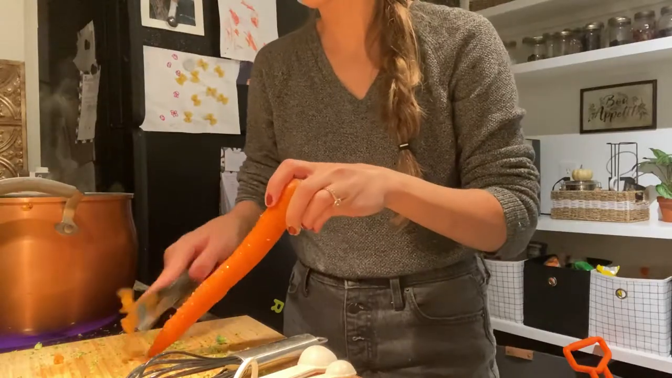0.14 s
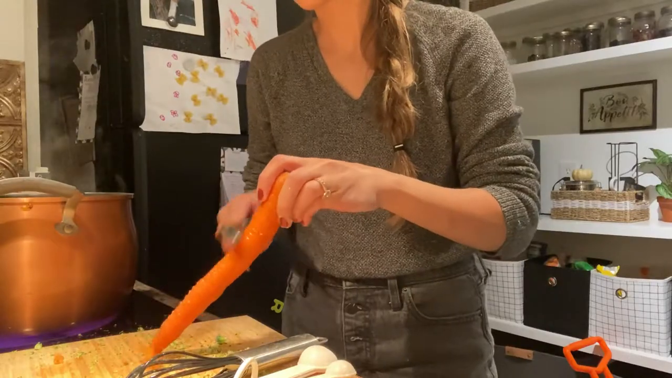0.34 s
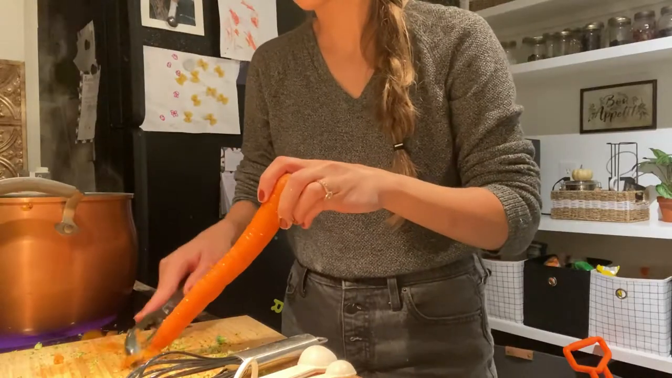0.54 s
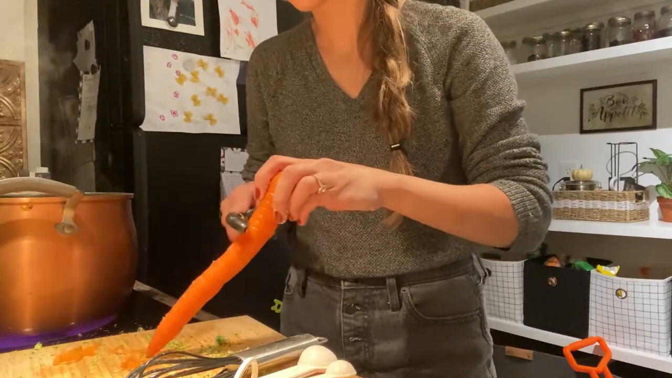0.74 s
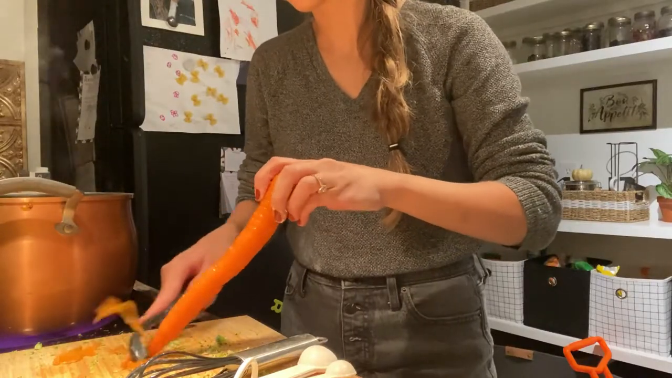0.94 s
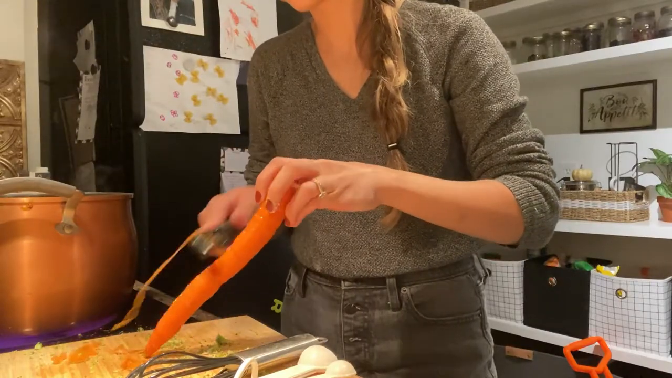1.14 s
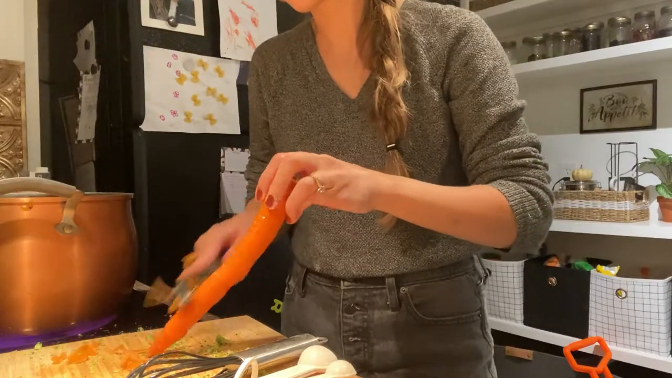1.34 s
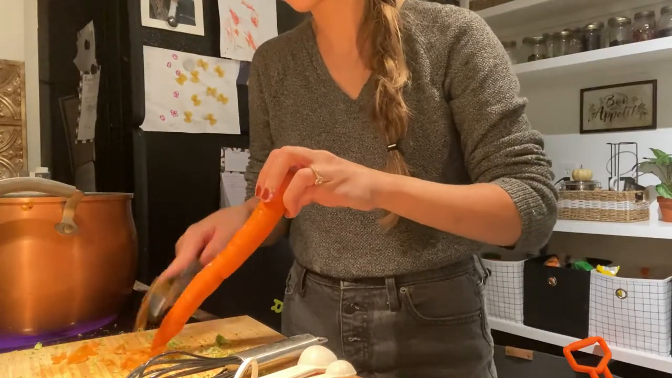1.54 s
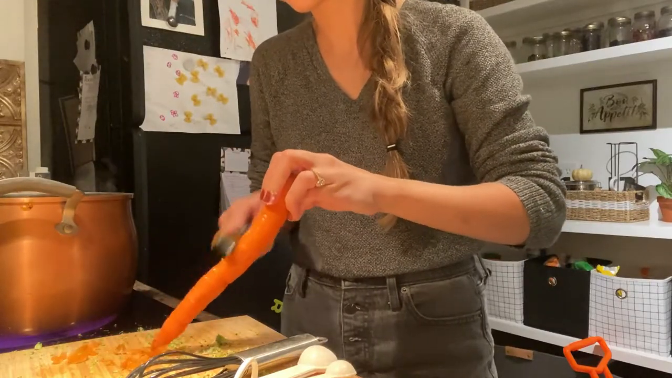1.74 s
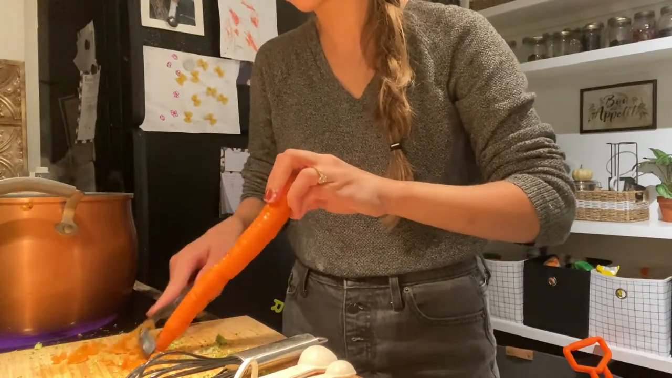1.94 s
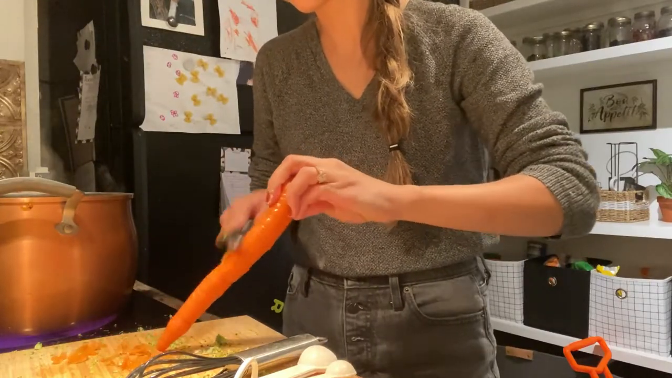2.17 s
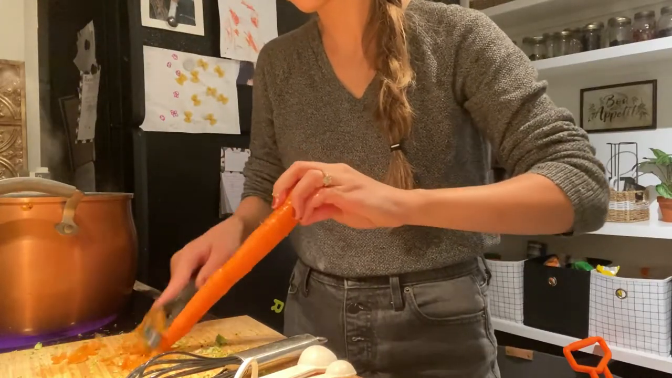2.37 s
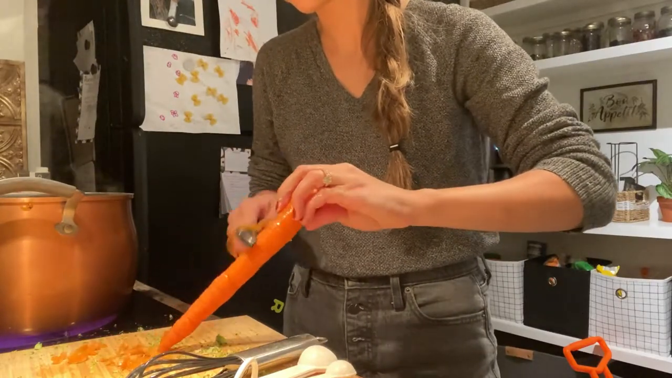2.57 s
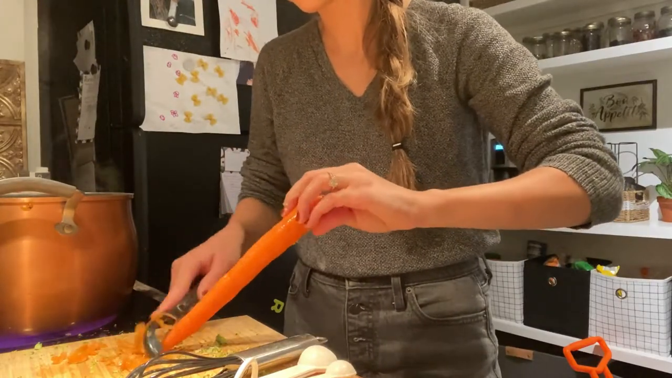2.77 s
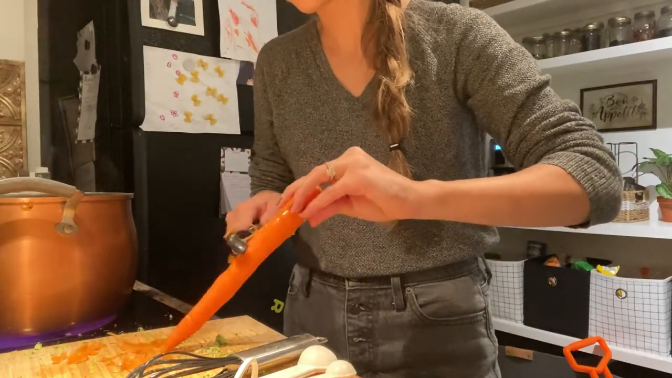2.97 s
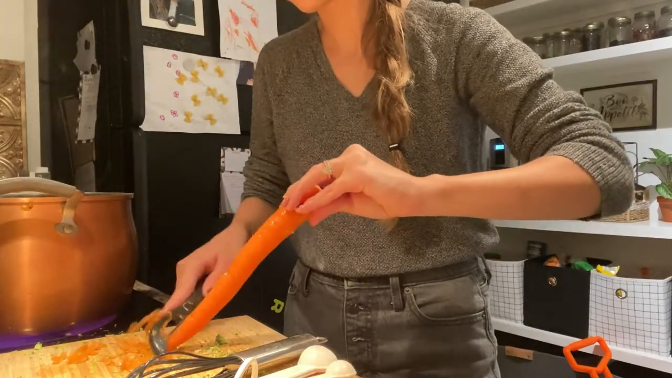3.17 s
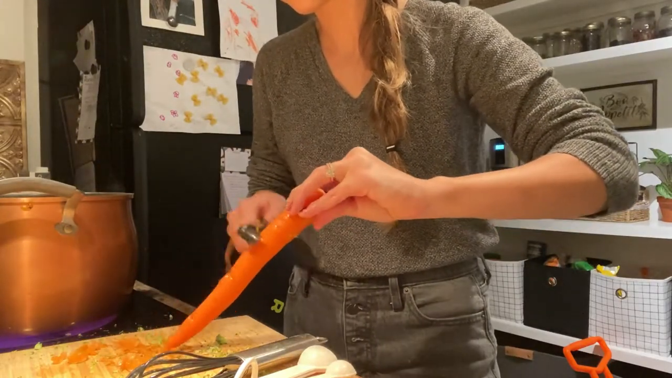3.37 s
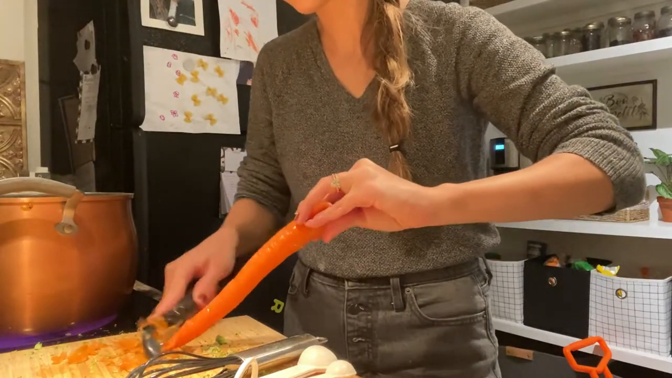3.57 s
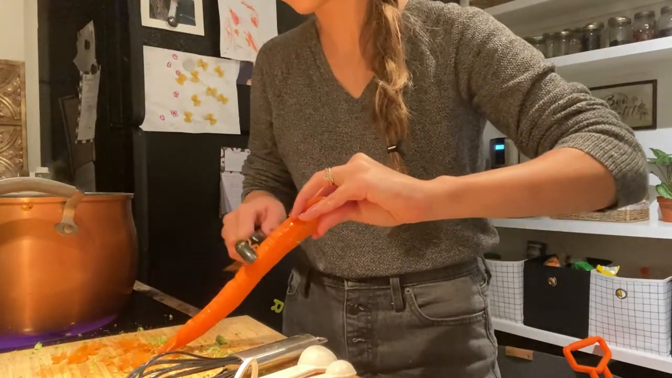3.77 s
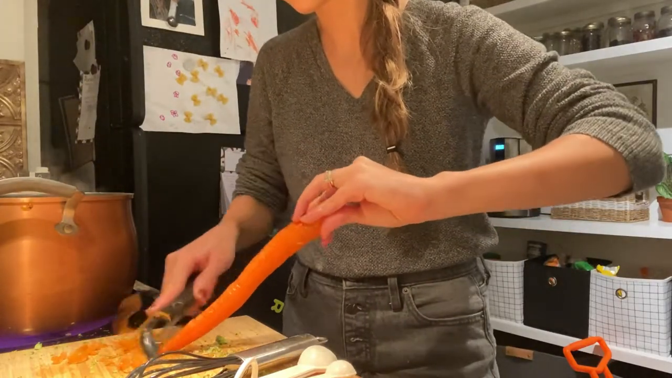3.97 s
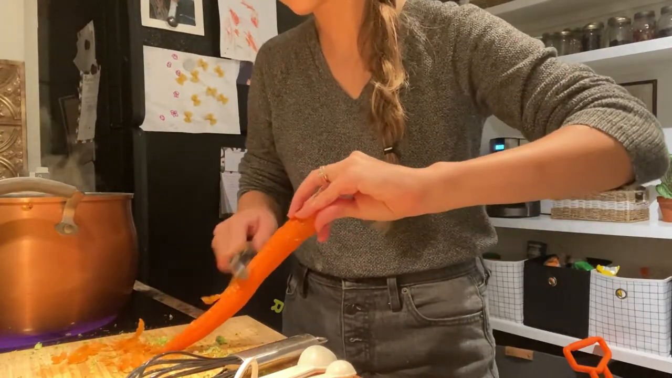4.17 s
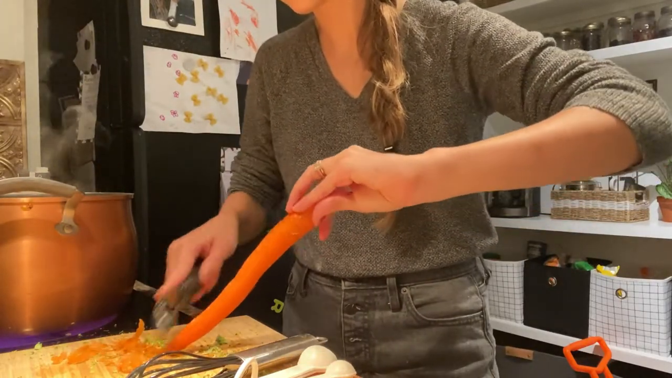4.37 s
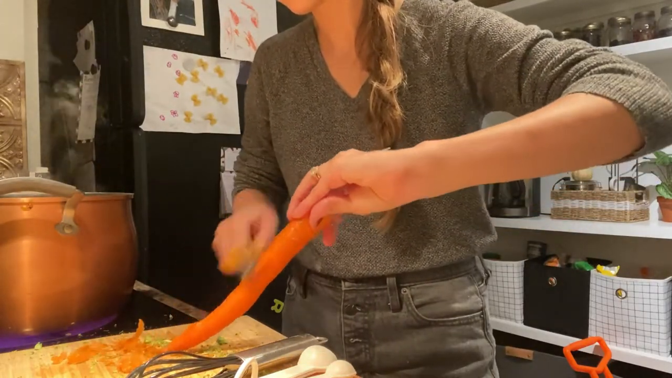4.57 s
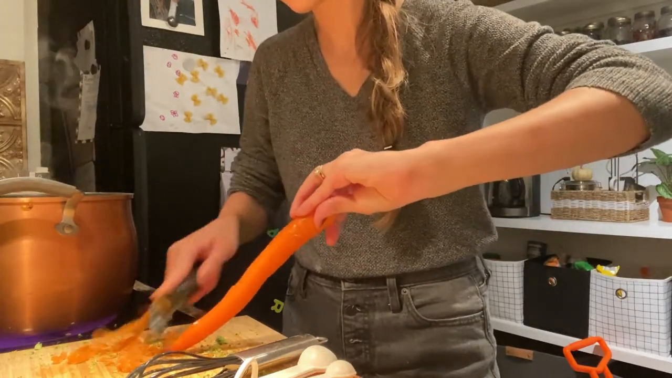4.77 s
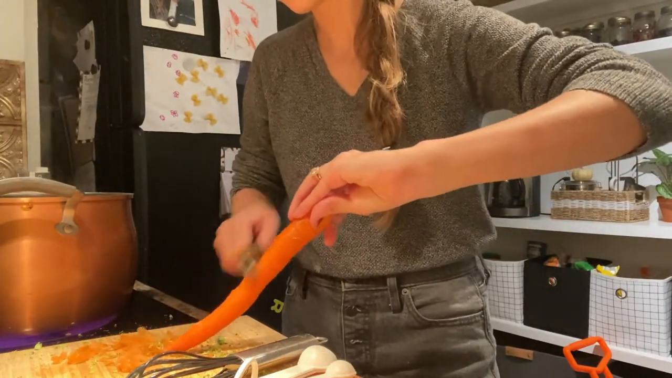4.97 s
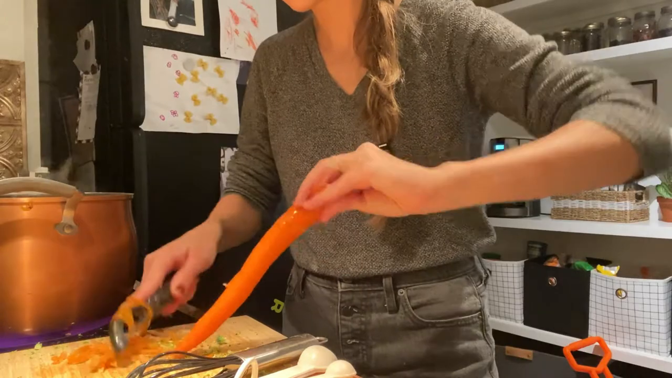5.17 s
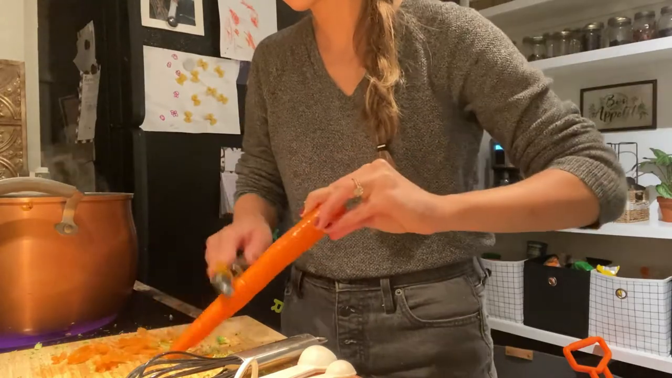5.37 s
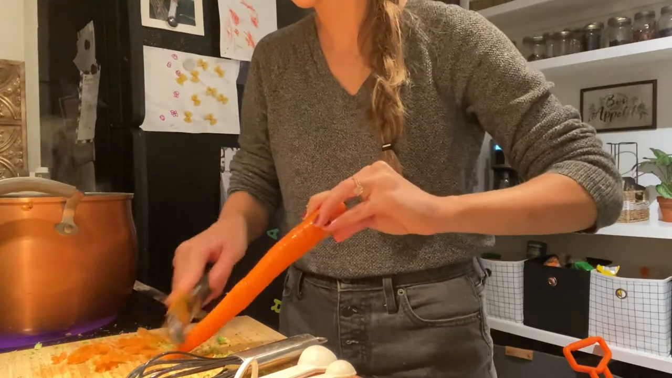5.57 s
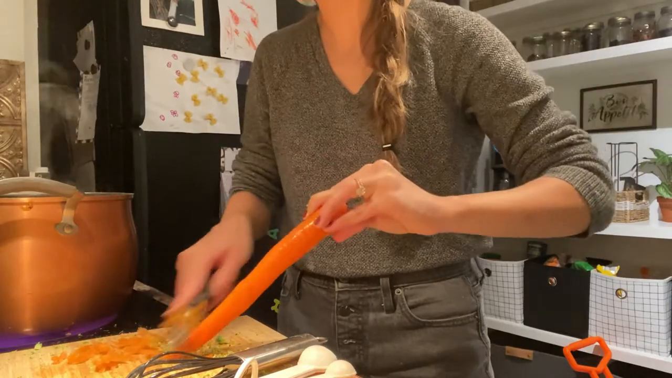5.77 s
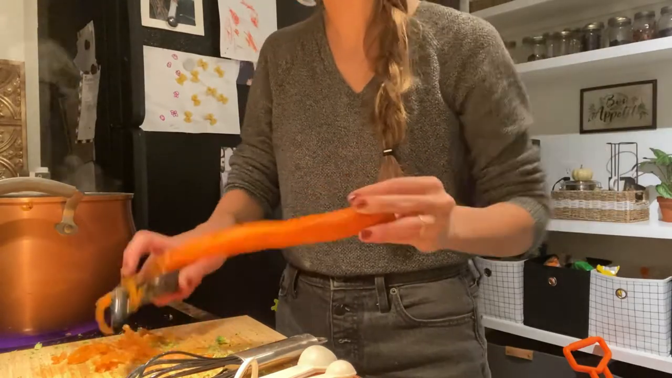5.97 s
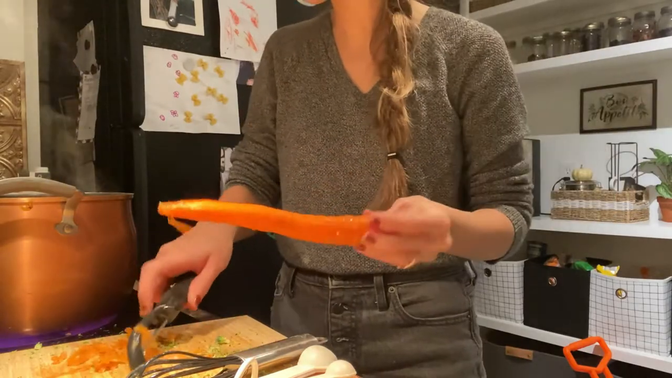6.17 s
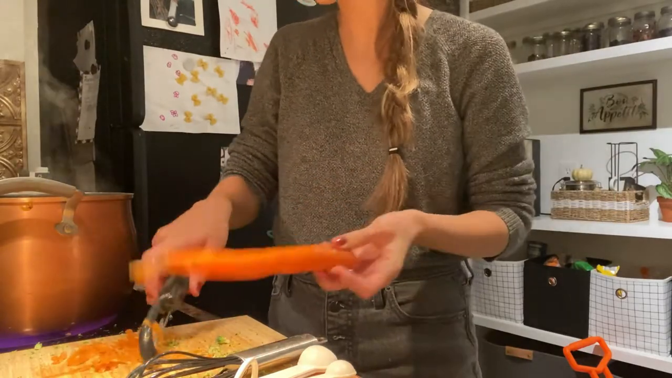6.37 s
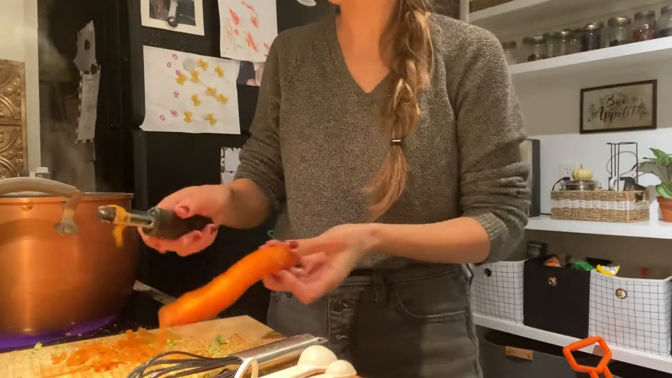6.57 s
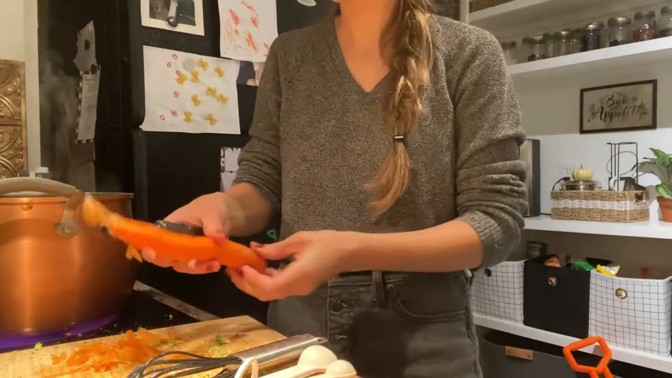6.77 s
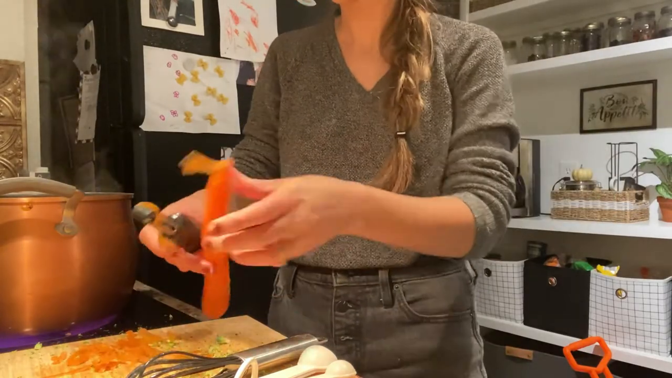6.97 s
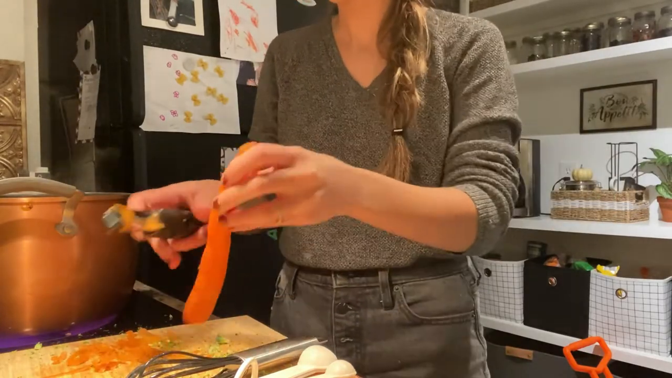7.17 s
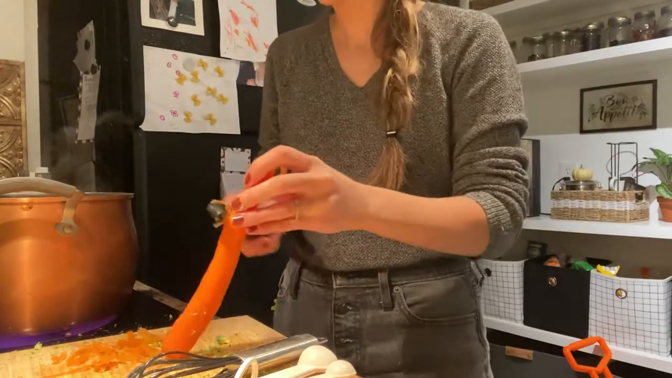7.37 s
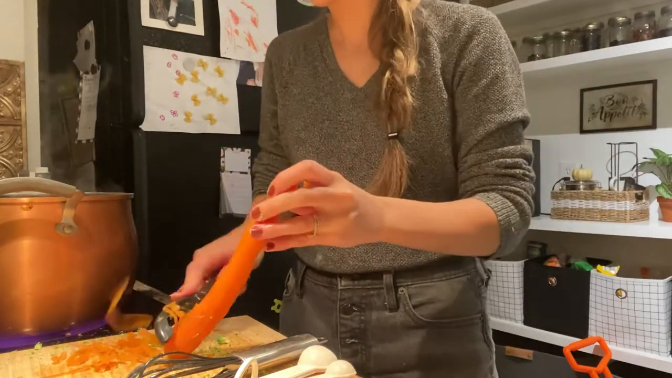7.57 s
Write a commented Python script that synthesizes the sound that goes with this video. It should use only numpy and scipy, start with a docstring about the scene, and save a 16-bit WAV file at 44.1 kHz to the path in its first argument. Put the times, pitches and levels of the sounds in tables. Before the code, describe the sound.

A loose-bladed peeler rasps down a raw carrot in quick crunchy strokes, knocking a wooden board, then taps clean, pauses and resumes.

```python
"""In a small kitchen, a swivel peeler strips a raw carrot whose tip rests on a wooden board.
Each stroke: the loose blade clacks onto the carrot as impacts ringing in steel modes, then crunches down it
as filtered grains and snaps while the board rumbles; often the peeler knocks on the board's resonances.
Three taps shake the peel off, a sleeve brushes as the carrot is turned over and set down, peeling resumes.
Air noise and a low drone lie behind; two microphones hear it all with near reflections and a tail."""
import sys
import numpy as np
from scipy import signal
from scipy.fft import rfft, irfft
from scipy.io import wavfile

SR = 44100
rng = np.random.default_rng(int(sys.argv[2]) if len(sys.argv) > 2 else 0)


def inscribe(sig):
    """Save sig as 16-bit PCM at rate SR to the path in sys.argv[1].

    A 1-D sig is mono; a 2-D sig holds one channel per row.
    Samples are clipped to [-1, 1] before scaling.
    """
    pcm = np.round(np.clip(np.atleast_2d(sig).T, -1, 1) * 32767)
    wavfile.write(sys.argv[1], SR, pcm.astype(np.int16))


N = 335601
TIME = np.arange(N) / SR
RING = TIME[:SR // 2]  # time axis of short sounds, s

# Pulls down the carrot. Each row: blade landing in seconds, length in seconds, clack level in dB,
# strongest ring in Hz, crunch at the tip in dB, juicy fizz at the tip in dB, board rumble at the
# hardest push in dB, place of that push along the stroke (0-1).
STROKES = [(-0.13, 0.23, -45, 5960, -38, -40, -29, 0.73), (0.3355, 0.24, -36.5, 5080, -41, -44.5, -29, 0.7),
           (0.7694, 0.23, -39.5, 6060, -41, -41.5, -32, 0.72),
           (1.283, .21, -42, 5600, -41, -43.5, -31, 0.72),
           (1.728, 0.22, -32, 7360, -40.5, -40.5, -27.5, 0.8),
           (2.1761, 0.21, -36, 6700, -40.5, -40, -26.5, 0.89), (2.594, 0.2, -34, 5380, -38, -40, -29, 0.9),
           (3.005, 0.23, -35.5, 6120, -37.5, -41.5, -33, 0.87),
           (3.452, 0.16, -38, 6500, -40, -41.5, -30, 0.7),
           (3.8363, 0.15, -30, 6660, -35, -38.5, -26.5, 0.99),
           (4.1976, .18, -32, 6030, -37, -45, -32.5, 0.76), (4.567, 0.19, -34, 6420, -35.5, -39, -28, 0.7),
           (4.9746, 0.2, -31.5, 6280, -38.5, -40, -33.5, 0.83),
           (5.449, 0.085, -35.5, 6960, -37.5, -40, -42, 0.65),
           (5.7662, 0.12, -39.5, 5760, -41.5, -40.5, -35, 0.87),
           (7.451, 0.12, -37.5, 6100, -42.5, -39.5, -24.5, 0.91)]
# Spectrum of the crunching flesh. Each row: frequency in Hz, level in dB.
CRUNCH_SPECTRUM = [(250, -31.5), (380, -6.5), (480, 0.5), (620, 4.5), (760, -10), (930, 3.5), (1100, -3),
                   (1360, 1.5), (1570, -5), (1800, -10.5), (2020, 3.5), (2400, 0.5), (2700, -8), (3400, -1),
                   (4100, -13), (5500, -30.5)]
# Spectrum of juice and wet peel. Each row: frequency in Hz, level in dB.
FIZZ_SPECTRUM = [(1760, -23), (3000, -7), (5620, -12.5), (7220, -10), (8900, -14.5), (10500, 0.5),
                 (11400, -16.5), (13100, -14), (14400, -14), (15900, -40.5)]


def undb(db):
    """Decibels to gain."""
    return 10 ** (np.asarray(db) / 20)


def on_log(hz, points):
    """Read (Hz, value) points on a log-frequency axis."""
    f, value = np.transpose(points)
    return np.interp(np.log(hz + 1), np.log(f), value)


def colour(x, points):
    """Minimum-phase filter with a (Hz, dB) spectrum and unit power gain."""
    size = 4096
    gain = undb(on_log(np.arange(size // 2 + 1) * SR / size, points))
    # folding the cepstrum makes the response causal
    cepstrum = irfft(np.log(gain))
    cepstrum[1:size // 2] *= 2
    cepstrum[size // 2 + 1:] = 0
    response = irfft(np.exp(rfft(cepstrum)))
    return signal.fftconvolve(x, response / np.linalg.norm(response))[:len(x)]


def burst(x, db):
    """Scale a short sound so that its energy, spread over 30 ms, has the given level."""
    return x * undb(db) / np.sqrt(np.sum(x ** 2) / (.03 * SR))


def ring(modes):
    """Impulse response of (Hz, dB, t60 s) modes."""
    return sum(undb(db - 60 * RING / t60) * np.sin(2 * np.pi * hz * RING) for hz, db, t60 in modes)


def drive(force, response):
    """Play a force through a response."""
    return signal.fftconvolve(force, response)[:len(force)]


def add(track, s, sound):
    """Mix a sound in at a time in seconds."""
    start = int(s * SR)
    part = sound[max(-start, 0):max(N - start, 0)]
    track[max(start, 0):max(start, 0) + len(part)] += part


def grains(length, per_s, spread_db):
    """Random tiny impacts of uneven size, rms 1."""
    size = undb(spread_db * np.minimum(rng.exponential(size=length), 4))
    x = (rng.random(length) < per_s / SR) * size * rng.choice([-1, 1], length)
    return x / np.sqrt(np.mean(x ** 2))


def walk(per_s):
    """Smooth chance with a spread near 1, given new values per second."""
    return 1.2 * np.interp(TIME * per_s, np.arange(4000), rng.standard_normal(4000))


def peeling():
    """Cells burst in uneven spurts, fibres crack and tear in short pitched snaps, the drag shakes the board."""
    catch_db, spurt_db = 4, -1.9  # unevenness: quick catches, slower spurts
    cracks_per_s, crack_db = 110, -4.5  # tough fibres that break singly, against the cells
    crunch_gain, fizz_gain, rumble_gain = stroke_gains()
    # the blade catches and frees itself about a hundred times a second
    grip = undb(catch_db * walk(110) + spurt_db * walk(45))
    cracks = undb(crack_db) * grains(N, cracks_per_s, 2.3)
    cells = (grains(N, 5000, 2.1) + cracks) * grip
    juice = grains(N, 7200, 4.2) * grip
    snaps = np.zeros(N)
    for when, pitch, size in rng.random((2400, 3)):
        hz = 430 * 7 ** pitch
        cycles = RING[:700] * hz
        snap = size ** 2 * hz * np.sin(2 * np.pi * cycles) * np.exp(-cycles / 3.4)
        add(snaps, when * N / SR, snap)
    tearing = wander(colour(0.64 * cells + 0.28 * snaps / snaps.std(), CRUNCH_SPECTRUM))
    fizz = colour(0.5 * cells + 0.71 * juice, FIZZ_SPECTRUM)
    # Board shaken by the dragging carrot. Each row: frequency in Hz, level in dB.
    rumble_spectrum = [(25, -14), (60, -12.5), (105, -4.5), (155, 3.5), (200, -10), (260, -5.5), (380, -27),
                       (600, -36.5)]
    rumble = colour(grains(N, 700, 1.5), rumble_spectrum)
    return crunch_gain * tearing + fizz_gain * fizz + rumble_gain * rumble


def stroke_gains():
    """Crunch, fizz and rumble gains: the blade glides, bites, speeds to the tip; the push shakes the board."""
    bite_share = 0.43  # the blade glides over this share of a stroke before it digs in
    bite_s, release_s = 0.012, 0.044  # it sinks into the flesh, and runs off the tip
    glide_db = -7.5  # gliding against cutting
    crunch_swell_db, fizz_swell_db = 15, -2.5  # change over a whole stroke
    rumble_sag_db = 26  # fall per stroke length away from the hardest push
    gains = np.zeros((3, N))
    for s, length, _, _, crunch_db, fizz_db, rumble_db, push in STROKES:
        bite = bite_share * length
        corners_s = [0, bite - bite_s / 2, bite + bite_s / 2, length, length + release_s]
        depth = np.interp(TIME - s, corners_s, [0, undb(glide_db), 1, 1, 0])
        touching = depth > 0
        along = np.minimum((TIME[touching] - s) / length, 1)
        gains[:, touching] += depth[touching] * undb([crunch_db + crunch_swell_db * (along - 1),
                                                      fizz_db + fizz_swell_db * (along - 1),
                                                      rumble_db - rumble_sag_db * abs(along - push)])
    return gains


def wander(x):
    """As the blade moves, the low, middle and high parts swell and sink on their own."""
    wander_db, wander_per_s = 3.5, 35
    low, upto = (signal.sosfiltfilt(signal.butter(3, hz, fs=SR, output="sos"), x) for hz in (750, 1700))
    return sum(undb(wander_db * walk(wander_per_s)) * part for part in (low, upto - low, x - upto))


def clacks():
    """Every stroke opens with a clack; later jerks of the blade are dull in the cut and bright in the air."""
    # Jerks on the pivot, snagging or swinging free. Each row: start in seconds, level in dB,
    # strongest ring in Hz.
    jerks = [(0.0328, -42, 7140), (0.5373, -43, 6180), (1.1352, -56.5, 8240), (1.363, -46, 6320),
             (2.2693, -49, 7400), (2.6627, -44.5, 7260), (2.888, -55, 7360), (3.126, -45, 9300),
             (3.1508, -38, 8800), (3.2193, -40.5, 6240), (3.294, -51.5, 7440), (4.273, -39.5, 5700),
             (4.428, -49.5, 7300), (4.6268, -39.5, 7200), (4.6729, -38, 7500), (4.813, -44, 5460),
             (5.3784, -62, 5700), (5.6318, -54.5, 5740), (6.198, -47, 6240), (6.296, -41, 6130),
             (6.34, -42, 6060), (6.4357, -43, 7630), (6.6813, -55.5, 4500), (6.716, -54.5, 4340),
             (6.9334, -73, 4340), (7.215, -73, 4450)]
    # Parts of a clack: dull crunch in dB and board thump in dB against the clack level,
    # steel ring in dB against the blade's chatter. Landing on the carrot, snagging, swinging free:
    landing_db = (-18, -11, -13)
    snag_db = (-5.5, -3.5, -20)
    free_db = (-33, -9, -3.5)
    landing_spread_s, jerk_spread_s = 0.0025, 0.0011  # time scale of the chatter
    graze_s = .0125
    out = np.zeros(N)
    for s, _, db, ring_hz, *_ in STROKES:
        add(out, s - graze_s, clack(db, ring_hz, landing_spread_s, landing_db))
    for s, db, ring_hz in jerks:
        in_cut = any(0 < s - lands < length for lands, length, *_ in STROKES)
        add(out, s - graze_s, clack(db, ring_hz, jerk_spread_s, snag_db if in_cut else free_db))
    return out


def clack(db, ring_hz, spread_s, parts_db):
    """The blade's chatter rings the steel and crunches dully; the carrot passes a little to the board."""
    dull_db, thump_db, ring_db = parts_db
    steel, force = chatter(spread_s, ring_hz, ring_db)
    rocking = np.pad(thump(db + thump_db), (int(.017 * SR), 0))[:len(RING)]
    return burst(steel, db) + burst(colour(force, CRUNCH_SPECTRUM), db + dull_db) + rocking


def chatter(spread_s, ring_hz, ring_db):
    """The blade grazes, then chatters on its pivot in tiny impacts; the contact point picks the ringing modes."""
    # Steel blade. Each row: frequency in Hz, level in dB, t60 in seconds.
    blade_modes = [(4320, -5, .08), (4610, -9, .08), (5930, 0, .06), (6080, -4, .08), (6420, -6, .06),
                   (7480, -7, .08), (7882, -11, .3), (11450, -10, .12), (12352, -9, .25), (13010, -4, .06),
                   (14350, -6, .08)]
    # Spectrum of the impacts. Each row: frequency in Hz, level in dB.
    impact_spectrum = [(350, -57), (600, -33), (983, -14), (1820, -19), (3110, -12.5), (4200, -10.5),
                       (5920, -4), (6790, -7), (8110, -10), (10400, -11.5), (11700, -10), (14000, -10),
                       (15000, -24.5), (15900, -38.5)]
    age = np.maximum(RING - .012, 0) / spread_s
    graze = .024 * np.minimum(RING / .012, 1) ** 2 * np.exp(-RING / .04)
    force = grains(len(RING), 14000, 3.0) * (age ** 2 * np.exp(-age * 1.73) + graze)
    modes = []
    for hz, db, t60 in blade_modes:
        favoured_db = 10 * np.exp(-(np.log(hz / ring_hz) / .05) ** 2)
        struck_hz = hz * (1 + .002 * rng.standard_normal())
        modes.append((struck_hz, db + 3 * rng.standard_normal() + favoured_db, t60))
    steel = burst(drive(force, ring(modes)), ring_db)
    return steel + burst(colour(force, impact_spectrum), 0), force


def knocks():
    """The peeler skids off the tip and strikes the wood: a hard crack, the blade's jingle, a slower thump."""
    # Each row: start in seconds, crack in dB, thump in dB, blade jingle in dB,
    # hardness as the tilt from 1 to 4 kHz in dB.
    strikes = [(0.073, -19, -27.5, -32, 5.5), (0.561, -22, -26.5, -37, 0), (1.007, -21.5, -27.5, -39, 3),
               (1.498, -29.5, -24.5, -38, -17.5), (1.942, -27.5, -21.5, -30.5, 4.5),
               (2.375, -20, -25, -27.5, 0), (3.62, -23, -26.5, -43, -7.5), (4.01, -21, -31, -39.5, -3.5),
               (4.356, -47.5, -33.5, -62, 13.5), (4.756, -30.5, -33, -58, -24.5),
               (5.15, -21.5, -34, -41, -2.5), (5.539, -20, -26, -37.5, -1), (5.865, -18.5, -28, -36, 2.5),
               (6.102, -23, -25.5, -32.5, -0.5), (6.252, -20, -23.5, -32.5, 1), (6.272, -30, -45, -32.5, 4),
               (6.393, -19, -24.5, -28, -1), (6.41, -32, -37.5, -37, -13)]
    taps_from_s = 6.0
    buzz_share = 0.084  # how strongly the frame buzzes on the wood after the blow
    jingle_ring_db = -5.5  # the steel's ring against its chatter
    jingle_lead_s = 0.012  # the blade starts to rattle just before each knock
    out = np.zeros(N)
    lead = int(.008 * SR)
    age = RING - RING[lead]
    skid = .009 * np.exp(-abs(age) / .006)
    buzz = buzz_share * np.exp(-abs(age) / 0.0028)
    for s, db, thump_db, jingle_db, hardness_db in strikes:
        force = np.where(age < 0, skid, buzz) * rng.standard_normal(len(RING))
        force[lead] = 1  # the blow
        add(out, s - RING[lead] - .0018, burst(wood(force, s > taps_from_s, hardness_db), db))
        jingle, _ = chatter(0.0045, 11000, jingle_ring_db)
        add(out, s - jingle_lead_s, burst(jingle, jingle_db))
        add(out, s + 0.0051, thump(thump_db))
    return out


def wood(force, at_edge, hardness_db):
    """Broad resonances of board and frame; bending waves bring the high notes first."""
    # Each row: frequency in Hz, width in Hz, level at the end of a stroke in dB,
    # level when tapped near the edge in dB.
    resonances = [(650, 110, -19, -8), (800, 80, -14, 1), (930, 130, -9, -9), (1030, 80, -10, -2),
                  (1235, 110, -1, 1), (1390, 150, -6, -5), (1660, 70, -20, -9), (1780, 100, -9, -2),
                  (2000, 190, -1.5, -5), (2320, 180, -3, -9), (2700, 220, -7, -10), (3040, 250, -7, -13),
                  (3600, 500, -16, -17), (4580, 500, -19, -21)]
    hz = np.arange(10, SR / 2, 10)
    power = undb(-38) ** 2 / (1 + (hz / 6000) ** 4)
    for f, width, end_db, edge_db in resonances:
        # every blow lands on a new spot, which shifts and reweights the resonances a little
        spot_hz = f * (1 + .012 * rng.standard_normal())
        spot_db = (edge_db if at_edge else end_db) + 1.5 * rng.standard_normal()
        power = power + undb(spot_db) ** 2 / (1 + ((hz - spot_hz) / width) ** 2) ** 2
    db = 10 * np.log10(power) + hardness_db * np.interp(hz, [1000, 4000], [0, 1])
    bins_hz = np.arange(len(force) // 2 + 1) * SR / len(force)
    travel = np.exp(-4j * np.pi * .11 * np.sqrt(bins_hz))  # delay .11 / sqrt(Hz) seconds
    return irfft(rfft(colour(force, np.column_stack([hz, db]))) * travel, len(force))


def thump(db):
    """The board rocks on the counter in low damped modes, a little differently each time."""
    # Each row: frequency in Hz, level in dB, t60 in seconds.
    counter_modes = [(66.8, -20.5, 0.57), (109.8, -16, 0.32), (157.2, 7.5, 0.031), (185.3, -4, 0.066),
                     (254.5, -12, 0.08)]
    rocking = ring([(hz * (1 + 0.045 * rng.standard_normal()), g, t60) for hz, g, t60 in counter_modes])
    return burst(signal.sosfilt(signal.butter(2, [50, 290], "band", fs=SR, output="sos"), rocking), db)


def bumps():
    """The soft carrot tip meets the board with a dull squash and rebounds once."""
    # Each row: start in seconds, level in dB.
    contacts = [(1.176, -42.5), (2.804, -34), (3.227, -39), (7.327, -22.5), (7.574, -25.5)]
    squash_db = -20.5  # against the first thump
    rebound_db, rebound_s = -8, 0.0183  # the second, softer thump
    flesh = [(200, -21.0), (380, -1.5), (560, 14.5), (1500, -4.0), (3000, -23.5), (9000, -28)]  # (Hz, dB)
    out = np.zeros(N)
    for s, db in contacts:
        squash = colour(rng.standard_normal(len(RING)) * np.exp(-RING / 0.0145), flesh)
        add(out, s + 0.0019, thump(db) + burst(squash, db + squash_db))
        add(out, s + 0.002 + rebound_s, thump(db + rebound_db))
    return out


def ribbons():
    """Wet strips of peel hang from the blade and patter faintly as grains, until the first peeling ends."""
    peel_until_s, ribbon_db, patter_db = 5.9, -61, 3.6
    hanging = np.interp(TIME, [peel_until_s - .2, peel_until_s], [1, 0])
    return hanging * undb(ribbon_db + patter_db * walk(25)) * colour(grains(N, 900, 3.6), FIZZ_SPECTRUM)


def sleeve():
    """Soft wool rubs as the carrot is turned: filtered noise; each brush swells and dies away."""
    # Each row: strongest moment in seconds, level in dB.
    brushes = [(6.89, -43), (7.209, -54)]
    # Each row: frequency in Hz, level in dB.
    cloth_spectrum = [(88, -74), (150, -18), (172, -4.5), (214, -9), (257, -11.5), (409, -15.5),
                      (1260, -25.5), (6000, -60), (7800, -91), (13200, -120)]
    swell_s, fade_s = 0.054, 0.097
    gain = np.zeros(N)
    for s, db in brushes:
        swell = np.clip(1 + (TIME - s) / swell_s, 0, 1)
        gain += undb(db) * swell * np.exp(-np.maximum(TIME - s, 0) / fade_s)
    return gain * undb(1.1 * walk(40)) * colour(rng.standard_normal(N), cloth_spectrum)


def kitchen():
    """Low, nearly steady air noise and the blurred drone of an appliance, a 242 Hz tone of wandering phase."""
    # Each row: frequency in Hz, level in dB.
    air_spectrum = [(25, -19.5), (60, -6), (190, -14), (250, 0.5), (310, -24), (440, -15.5), (600, -32),
                    (1000, -26.5), (3000, -33), (8000, -42), (15000, -51)]
    draught_db = 1.5  # unevenness of the air noise
    mid, side = (colour(rng.standard_normal(N), air_spectrum) for _ in range(2))
    turn = 2 * np.pi * 242 * TIME
    drone = undb(-56) * (walk(40) * np.sin(turn) + walk(40) * np.cos(turn))
    air = mid + 0.6 * side * np.array([[1], [-1]])
    return undb(-50.5 + draught_db * walk(5.4)) * air + drone


def room(x, early_db, tail_db):
    """Each microphone hears the direct sound, near reflections off counter and pot, and the room's tail."""
    # Each row: frequency in Hz, t60 in seconds.
    tail_t60 = [(100, 0.41), (300, 0.23), (900, 0.29), (2000, 0.31), (5000, 0.31), (14000, 0.27)]
    # Each row: frequency in Hz, level in dB.
    tail_spectrum = [(60, 6), (200, 0), (400, 6), (900, -2.5), (2000, 0.5), (3000, -0.5), (5000, 1),
                     (14000, -4.5)]
    shared = 0.31  # power share of the near reflections that both microphones hear alike
    hz, s, _ = signal.stft(RING, SR, nperseg=256)
    fade = undb(-60 * s / on_log(hz, tail_t60)[:, None])
    alike = grains(len(RING), 5000, 1.0)
    channels = []
    for _ in range(2):
        noise = signal.stft(rng.standard_normal(len(RING)), nperseg=256)[2]
        tail = signal.istft(noise * fade, nperseg=256)[1][:len(RING)]
        tail = colour(tail * np.clip((RING - .003) / 0.0009, 0, 1), tail_spectrum)
        early = np.sqrt(shared) * alike + np.sqrt(1 - shared) * grains(len(RING), 5000, 0.82)
        early = early * np.exp(-RING / 0.004) * (RING > .0003)
        # small things mirror no bass
        early = signal.sosfilt(signal.butter(2, 400, "high", fs=SR, output="sos"), early)
        response = undb(tail_db) * tail / np.linalg.norm(tail) + undb(early_db) * early / np.linalg.norm(early)
        channels.append(x + drive(x, response))
    return np.array(channels)


def scene():
    """All sources in the room; the bass arrives nearly alike at both microphones, stronger on the left."""
    near = room(peeling() + ribbons() + sleeve(), -1.5, -5.0)
    near = near + room(clacks(), 6, -2) + room(knocks() + bumps(), -2.5, -7.0)
    bass = signal.sosfiltfilt(signal.butter(2, 220, fs=SR, output="sos"), near)
    shared_bass = (0.26 * bass + 0.82 * bass.mean(axis=0)) * undb([[1.8], [-2.2]])
    return near - bass + shared_bass + kitchen()


def record(dry):
    """Two ports differ in phase, lose deep bass and a treble notch; full scale clips, a low-pass ends the top."""
    # Each row: frequency in Hz, lead of the left port in radians.
    port_phase = [(0, 0), (520, -1.6), (950, 0.3), (1380, -1.0), (2070, -0.3), (4390, 0.9), (6030, 5.4),
                  (8350, 6.3), (9730, 9.0), (10900, 9.6), (12500, 12.5), (13700, 12.9), (14800, 15.5),
                  (15600, 15.7)]
    top_hz = 15200
    hz = np.arange(N // 2 + 1) * SR / N
    notch = undb(-26 * np.exp(-((hz - 10400) / 600) ** 4))
    low_cut = hz ** 2 / np.sqrt(hz ** 4 + 42 ** 4)
    ports = np.exp(.5j * np.interp(hz, *np.transpose(port_phase)) * np.array([[1], [-1]]))
    heard = np.clip(irfft(rfft(dry) * notch * low_cut * ports, N), -1, 1)
    return signal.sosfilt(signal.ellip(8, .2, 70, top_hz, fs=SR, output="sos"), heard)


dry = scene()
out = record(dry)
inscribe(out)
```